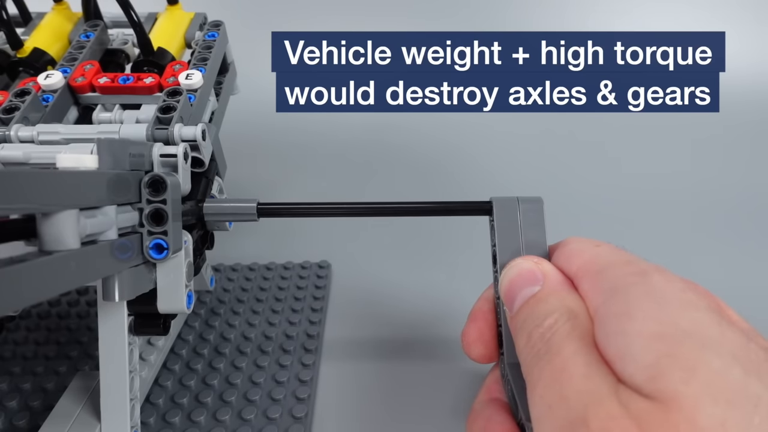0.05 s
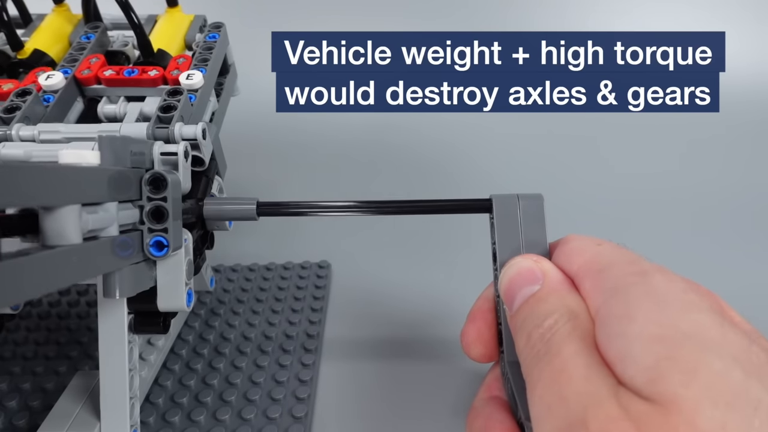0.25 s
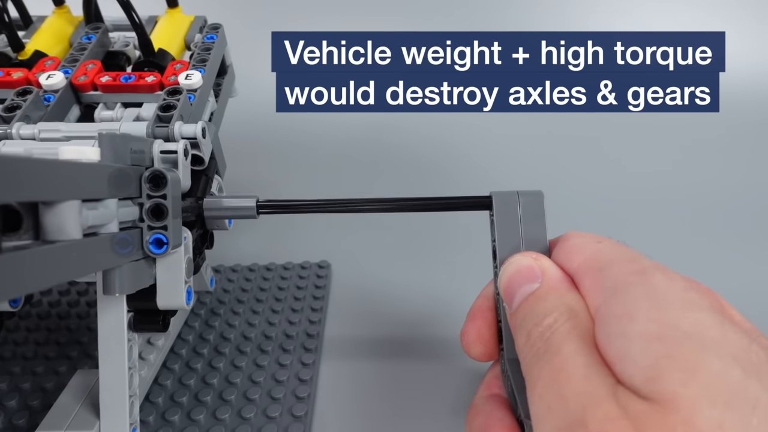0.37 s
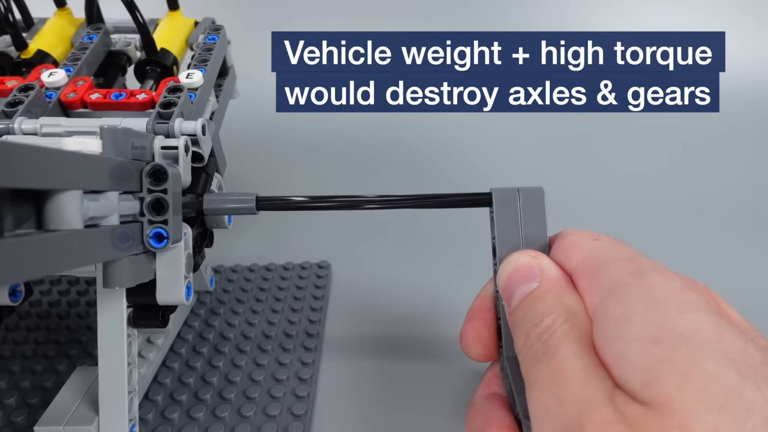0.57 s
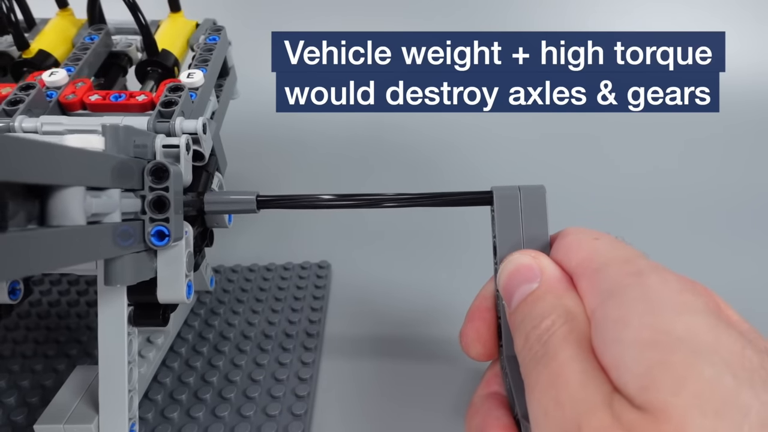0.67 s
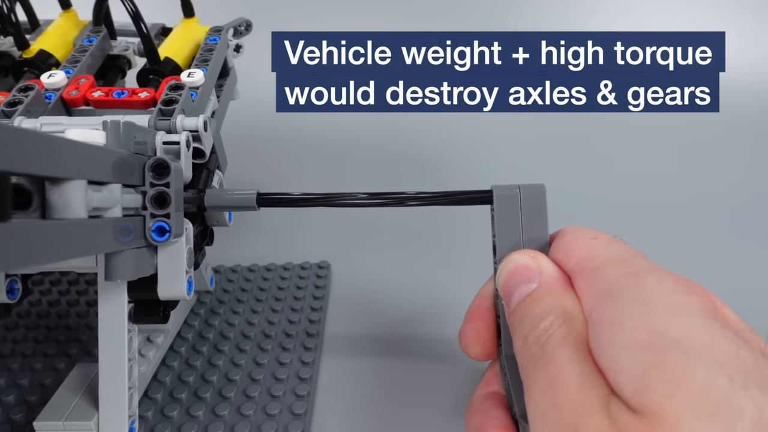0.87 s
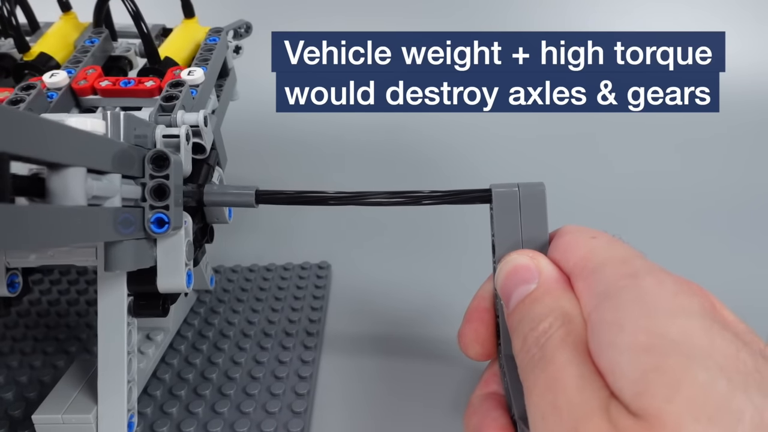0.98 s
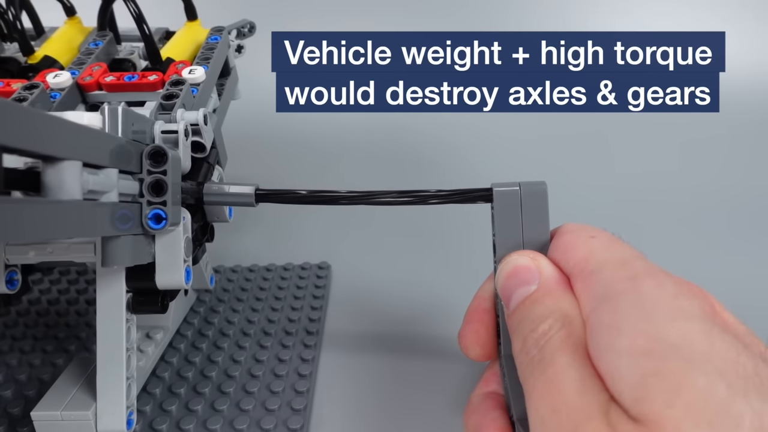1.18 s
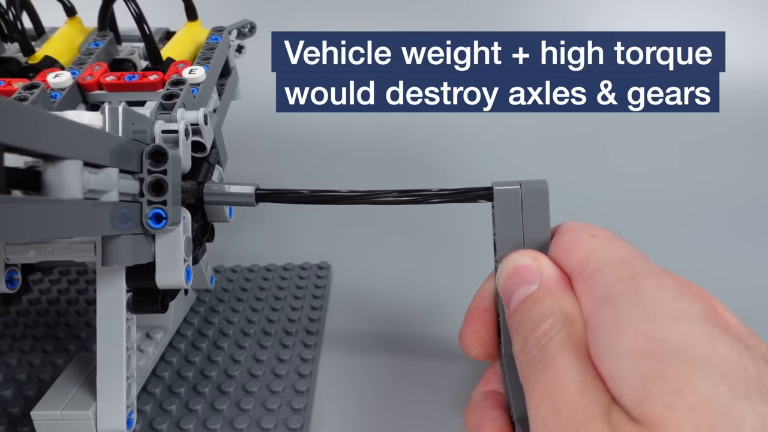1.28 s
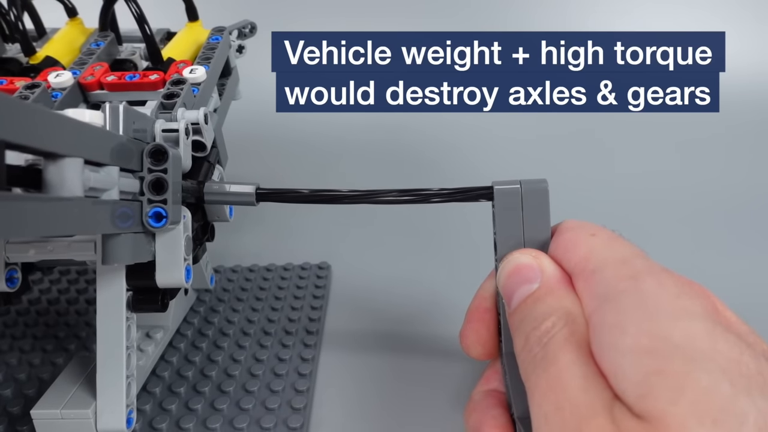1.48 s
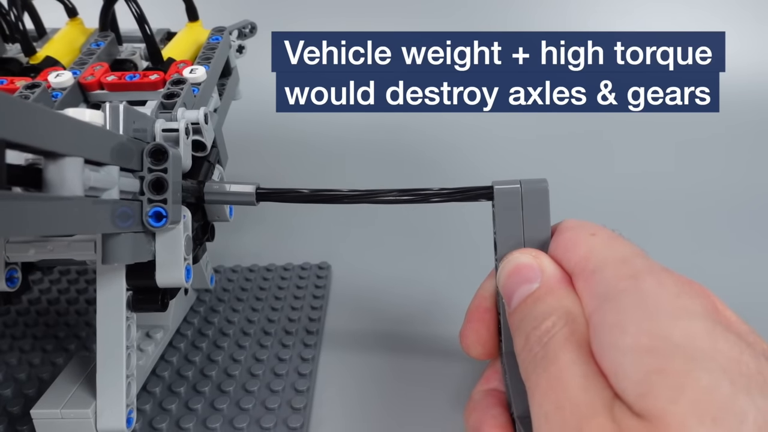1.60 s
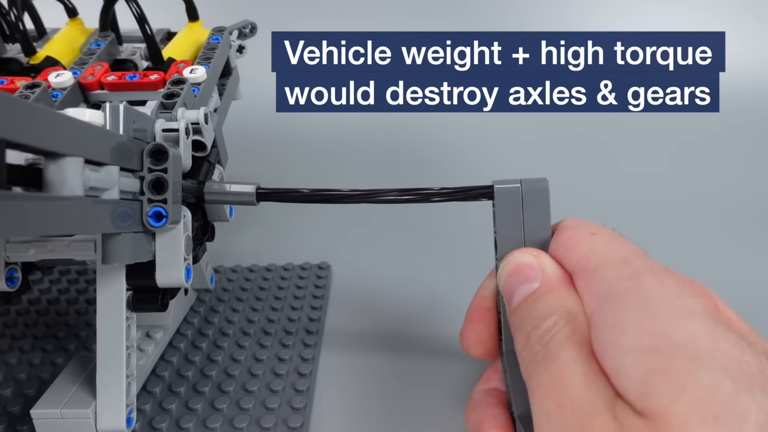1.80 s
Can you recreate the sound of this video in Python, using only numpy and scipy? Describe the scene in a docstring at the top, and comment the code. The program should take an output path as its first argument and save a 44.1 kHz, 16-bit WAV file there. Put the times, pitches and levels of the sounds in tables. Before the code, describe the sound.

Plastic parts creak in short hissing rasps, then snap, with faint air hiss.

```python
"""A plastic toy axle twists under load in an air-driven model, close to a stereo microphone on a table.
First air seeps faintly as pressure builds, and the parts crackle as they take up the load.
Then they give way in short hissing rasps, some with a thin squeak, and the jerks thud through the frame.
Just after one second a joint snaps over and back, exciting the frame's normal modes.
A few soft knocks follow, and air goes on leaking with a thin hiss and an airy whistle."""
import sys
import numpy as np
from scipy import signal
from scipy.fft import rfft, irfft
from scipy.io import wavfile

SR = 44100
rng = np.random.default_rng(int(sys.argv[2]) if len(sys.argv) > 2 else 0)


def wrap_up_sound(samples):
    """Save the sound to the file named by the first command line argument, as 16-bit audio."""
    columns = np.atleast_2d(samples).T
    # keep every value between -1 and 1, then stretch to whole-number steps
    tamed = np.clip(columns, -1, 1)
    steps = np.round(tamed * 32767).astype(np.int16)
    wavfile.write(sys.argv[1], SR, steps)


N = 81585


def undb(db):
    """Amplitude ratio of a level in decibels."""
    return 10 ** (np.asarray(db) / 20)


def pan(db):
    """Left and right gains for a level difference."""
    return undb(np.array([[db], [-db]]) / 2)


def clock():
    """Time of every sample."""
    return np.arange(N) / SR


def noise(own=0.78):
    """White noise at 0 dB per Hz, partially coherent between the two microphone ports."""
    white = rng.standard_normal((3, N))
    return (np.sqrt(1 - own ** 2) * white[0] + own * white[1:]) * np.sqrt(SR / 2)


def wander(rate_hz):
    """Linear interpolation between random values of unit variance."""
    return np.interp(clock() * rate_hz, np.arange(N), rng.standard_normal(N))


def colour(x, points, size=2048):
    """Minimum-phase filter through (f/Hz, level/dB) points, by folding the cepstrum."""
    hz, db = np.array(points, float).T
    f = np.maximum(np.fft.rfftfreq(size, 1 / SR), 1)
    cepstrum = irfft(np.log(undb(np.interp(np.log(f), np.log(hz), db))))
    cepstrum[1:size // 2] *= 2
    cepstrum[size // 2 + 1:] = 0
    response = irfft(np.exp(rfft(cepstrum)))
    return np.apply_along_axis(signal.fftconvolve, -1, x, response)[..., :N]


def resonate(x, hz, width_hz):
    """Two resonators in cascade, with unit gain at the centre."""
    b, a = signal.iirpeak(hz, hz / width_hz, fs=SR)
    return signal.lfilter(b, a, signal.lfilter(b, a, x))


def cut(x, hz, kind="low"):
    """Second-order low-pass or high-pass."""
    return signal.sosfilt(signal.butter(2, hz, kind, fs=SR, output="sos"), x)


def swell(peak, hold, rise, fall):
    """Exponential growth up to the peak time, a plateau, then exponential decay."""
    t = clock() - peak
    return np.exp(np.minimum(t, 0) / rise - np.maximum(t - hold, 0) / fall)


def blow(start, rise, fall):
    """Transient envelope: a linear ramp, then exponential decay."""
    t = np.maximum(clock() - start, 0)
    return np.minimum(t / rise, 1) * np.exp(-np.maximum(t - rise, 0) / fall)


def ring(start, modes, size=22050):
    """Free vibration: a sum of damped modes of random polarity."""
    t = np.arange(size) / SR
    tone = sum(rng.choice([-1, 1]) * undb(db) * np.sin(2 * np.pi * hz * t) * 1000 ** (-t / t60)
               for hz, db, t60 in modes)
    return np.concatenate([np.zeros(int(start * SR)), tone, np.zeros(N)])[:N]


# ambient spectrum (f/Hz, level/dB per Hz)
ROOM_SPECTRUM = [(25, -86.5), (60, -93.5), (130, -88.5), (220, -86.5), (400, -99), (1000, -107),
                 (2500, -116), (16000, -120)]
def room_floor():
    """Stationary noise: the quiet room, strongest at low frequencies."""
    return colour(noise(), ROOM_SPECTRUM)


def reflections(x, port_lag_s=0.00018, early_decay_s=0.0077, t60_s=0.23, size=16384):
    """Sound reaches the left port first; table and model scatter it, and the small room reverberates."""
    t = np.arange(size) / SR
    decays = np.exp([-t / early_decay_s, -np.log(1000) * t / t60_s]) * (t > 0.0006)
    out = []
    for side, lag in zip(x, (0, port_lag_s)):
        early, late = rng.standard_normal((2, size)) * decays
        echoes = undb(-5.5) * early / np.linalg.norm(early) + undb(-12.5) * late / np.linalg.norm(late)
        path = cut(echoes, 193, "high")
        path[round(lag * SR)] += 1  # direct sound
        out.append(signal.fftconvolve(side, path / np.linalg.norm(path))[:N])
    return np.array(out)


# envelope of the first faint leak (t/s, level/dB)
SEEP_ENVELOPE = [(0, -112), (.08, -96.5), (.2, -84.5), (.35, -82), (.5, -82), (.61, -78.5), (.78, -77),
                 (.84, -81), (.905, -76), (1.03, -74), (1.07, -77), (1.2, -107)]
# its spectrum (f/Hz, level/dB)
SEEP_SPECTRUM = [(1000, -13.5), (2600, -13.5), (3500, -12.5), (4400, -11.5), (5500, -10), (6600, -7),
                 (8200, -5.5), (10000, -8), (12200, -2), (16000, -5)]
def seep():
    """Flow noise: air seeps as pressure builds, and fades at the snap."""
    times, levels = np.array(SEEP_ENVELOPE).T
    return colour(noise(), SEEP_SPECTRUM) * undb(np.interp(clock(), times, levels))


# spectrum of the steady leak (f/Hz, level/dB)
LEAK_SPECTRUM = [(1000, -18.5), (2200, -21.5), (2700, -13), (3300, 4), (5600, -2), (7000, 1), (9400, -3.5),
                 (11000, -2), (12300, 2.5), (13600, 5.5), (14400, -11), (16000, -22)]
def leak(start_s=1.15, hiss_rise_s=0.0077, whistle_rise_s=0.11):
    """Flow noise after the snap: a broadband hiss with one late puff, and a growing resonant whistle."""
    t = clock()
    puff_db = 4 * np.exp(-((t - 1.775) / 0.026) ** 2)
    hiss = undb(-80.5 + puff_db) * colour(noise(), LEAK_SPECTRUM)
    hiss *= np.clip((t - start_s) / hiss_rise_s, 0, 1)
    whistle = undb(-66.5) * resonate(noise(), hz=3800, width_hz=550)
    whistle *= np.clip((t - start_s) / whistle_rise_s, 0, 1)
    return (hiss + whistle) * undb(0.71 * wander(39.66))


# jerks of the frame (t/s, level/dB, f/Hz)
JERKS = [(.183, -48, 214), (.224, -24, 235.7), (.243, -24, 180.6), (0.273, -30, 157), (0.305, -32, 164),
         (.388, -29.5, 184), (.420, -28.5, 161.7), (0.545, -27.5, 190), (.594, -39, 148),
         (0.649, -40.5, 180), (0.699, -34, 176), (0.727, -32, 162.6), (0.947, -27.5, 170.3),
         (0.986, -31, 185.6), (1.086, -22.5, 206.8), (1.153, -32, 213), (1.465, -44.5, 197)]
# modes of table and room (f/Hz, level/dB, T60/s)
TABLE_MODES = [(124.9, -11.5, 0.31), (150.5, -10, 0.43), (218.6, -13, 0.56)]
# spectrum of the shaken loose parts (f/Hz, level/dB)
RUSTLE_SPECTRUM = [(80, -13.5), (150, 2.5), (270, 2), (420, -4), (600, -13), (1200, -27), (4000, -53)]
def thuds(rise_s=0.0053):
    """Damped oscillation: each jerk rocks the frame, shakes loose parts and sets the table booming."""
    out, shake = 0, 0
    for start, db, hz in JERKS:
        rock = blow(start, rise_s, fall=0.025) * np.sin(2 * np.pi * hz * (clock() - start))
        out += undb(db) * (rock + ring(start, TABLE_MODES))
        shake += undb(db) * blow(start, rise_s, fall=0.03)
    return out + undb(-41) * colour(noise() * shake, RUSTLE_SPECTRUM)


# small slips of the loaded parts (t/s, decay/s, level/dB)
SLIPS = [(0.209, 0.012, -68.5), (0.222, 0.0071, -75.5), (0.2266, 0.0038, -64), (0.2329, 0.021, -68),
         (0.2697, 0.0015, -62), (0.272, 0.0027, -62.5), (0.2872, 0.0043, -64.5), (0.307, 0.013, -78.5),
         (0.422, 0.015, -70.5), (0.591, 0.0061, -73.5), (0.598, 0.0045, -79), (0.699, 0.0078, -68),
         (0.746, .004, -60.5)]
# their spectrum (f/Hz, level/dB)
SLIP_SPECTRUM = [(150, 3), (600, -6), (1000, -4.5), (1400, -8.5), (2400, 0.5), (4000, 0), (7000, -2),
                 (11000, -2), (16000, -8)]
def crackles():
    """Stick-slip friction: clusters of tiny slips between plastic parts radiate bursts of noise."""
    force = sum(undb(db) * blow(start, 0.0011, decay) for start, decay, db in SLIPS)
    return colour(noise() * force * undb(1.1 * wander(1800)), SLIP_SPECTRUM)


# squeaks that lead into a rasp or ride on it (peak t/s, rise/s, f/Hz, level/dB)
SQUEAK_EVENTS = [(.522, 0.0059, 4300, -61.5), (.545, .006, 12800, -67), (.660, 0.023, 4070, -60.5),
                 (.664, 0.012, 12140, -45), (.918, 0.043, 4400, -61.5), (.930, 0.041, 6530, -63.5),
                 (0.985, .006, 8250, -47), (0.991, 0.006, 3750, -51.5), (.988, 0.011, 12800, -42),
                 (1.128, 0.011, 11200, -51.5)]
def squeaks(width_hz=590, fall_s=0.0088):
    """Forced resonance: a narrow band of noise swells as the parts are about to give way."""
    drive = noise()
    return sum(undb(db) * resonate(drive, hz, width_hz) * swell(peak, 0, rise, fall_s)
               for peak, rise, hz, db in SQUEAK_EVENTS)


# rasps (t/s, hold/s, L-R/dB, rush level/dB, then f/Hz, level/dB for each of three gap resonances)
RASP_EVENTS = [(.380, 0.011, 0.5, -66, 4450, -66, 7100, -62, 12600, -62),
               (0.411, 0.0092, -2.5, -67.5, 4480, -59, 6300, -64.5, 13600, -88),
               (0.532, 0.02, -0.5, -64.5, 3660, -58.5, 6520, -57, 13000, -60.5),
               (0.657, 0.029, -1, -68, 4100, -55.5, 6700, -63.5, 11500, -59),
               (0.712, 0.024, -1, -63, 4040, -59.5, 5900, -53, 12300, -62),
               (.927, 0.014, -2.5, -70, 4350, -56.5, 6500, -63, 12140, -55),
               (0.949, 0.016, 4.5, -67.5, 3870, -63.5, 6440, -67, 13200, -75),
               (0.979, 0.023, -2, -61, 3880, -53, 6000, -58, 12200, -60),
               (1.108, 0.043, -0.5, -71.5, 4040, -52, 7400, -60, 11900, -63.5)]
# spectrum of the broadband rush (f/Hz, level/dB)
RUSH_SPECTRUM = [(200, -11.5), (600, -12), (1000, -14.5), (1400, -18), (2300, -4.5), (2900, -5.5),
                 (3600, -3), (5500, -3), (7600, 1), (8600, 3), (10000, 1), (11000, 4), (14500, 6.5),
                 (16000, -20)]
def rasps(widths_hz=(1120, 1350, 1660)):
    """Noise-driven resonances of the gap: each rasp starts as a ringing hiss and opens into a rush."""
    ringing, rush_envelope, drive = 0, 0, noise()
    for peak, hold, pan_db, rush_db, *gap in RASP_EVENTS:
        rush_envelope += undb(rush_db) * pan(pan_db) * swell(peak, hold, rise=0.0047, fall=0.0073)
        push = drive * pan(pan_db) * swell(peak, hold, rise=0.01, fall=0.015)
        for hz, db, width in zip(gap[::2], gap[1::2], widths_hz):
            ringing += undb(db) * resonate(push + 1e-18, hz, width)
    rush = colour(noise() * rush_envelope, RUSH_SPECTRUM)
    grain = undb(0.5 * wander(700))
    return (ringing + rush) * grain


# snaps of the joint, then knocks (t/s, level/dB, cutoff f/Hz, focus f/Hz, L-R/dB, ring level/dB)
IMPACTS = [(1.0825, -8.5, 15300, 4640, -8, 2), (1.0855, -12, 10800, 2300, 7.5, 3),
           (1.0905, -16.5, 3940, 1050, 4.5, 1.5), (1.1525, -9, 9000, 1530, -3, 0.5),
           (1.155, -18.5, 1470, 833, -1.5, 7.5), (1.345, -17.5, 380, 488, -1, 1.5),
           (1.427, -21.5, 553, 570, 2, 1.5), (1.4645, -29.5, 2600, 1760, -1.5, 10.5),
           (1.467, -18, 660, 585, 1, -2.5)]
# normal modes of the plastic frame (f/Hz, level/dB, T60/s)
FRAME_MODES = [(403, -14.5, 0.051), (621, -11.5, 0.059), (734, -7.5, 0.047), (914, -6, .1),
               (1005, -8, 0.067), (1514, -3, 0.026), (1597, 1.5, 0.032), (1970, -27, 0.023),
               (2070, -18, 0.045), (2356, 1, 0.024), (4760, 1, 0.034), (5830, -5, 0.043),
               (6500, -15, 0.029), (11800, 2.5, .04)]
# spectrum of the contact crack (f/Hz, level/dB)
CRACK_SPECTRUM = [(100, -1.5), (400, 0.5), (650, -3), (950, 2), (1200, -8.5), (1550, 8), (2900, 3.5),
                  (4400, -1), (6500, 4.5), (8300, 0.5), (11300, -2.5), (16000, 2)]
def snaps(focus_db=12, focus_octaves=0.39):
    """Impact excitation: a crack, a rattle and modes favoured near one pitch; soft knocks are duller."""
    out = 0
    crack_noise, rattle_noise = noise() / np.sqrt(SR / 2), rng.standard_normal((2, N))
    for start, db, cutoff_hz, focus_hz, pan_db, ring_db in IMPACTS:
        crack = undb(-1) * colour(crack_noise * blow(start, rise=0.00055, fall=0.0036), CRACK_SPECTRUM)
        rattle = undb(-19) * cut(rattle_noise * blow(start, rise=0.0088, fall=0.05) + 1e-18, hz=1890)
        modes = [(hz, mode_db + focus_db * np.exp(-(np.log2(hz / focus_hz) / focus_octaves) ** 2), t60)
                 for hz, mode_db, t60 in FRAME_MODES]
        ringing = undb(ring_db - 16) * ring(start, modes)
        out += cut(crack + ringing + rattle, cutoff_hz) * undb(db) * pan(pan_db)
    return out


def scene(low_cut_hz=99):
    """Superposition: the small parts, weak in deep bass, sound in the room over its noise floor."""
    parts = snaps() + crackles() + rasps() + squeaks() + thuds() + seep() + leak()
    radiated = cut(cut(parts, low_cut_hz, "high"), low_cut_hz, "high")
    return reflections(radiated) + room_floor()


# level difference between the ports (f/Hz, L-R/dB)
PORT_BALANCE = [(60, -4), (170, -1), (350, 4.5), (700, -1), (1400, 3.5), (2800, 0.5), (5600, -1),
                (10000, 2), (14000, -2.5)]
def record(dry, ceiling=0.6, top_hz=15850):
    """Transduction: the ports differ in response, saturation rounds the peaks, a low-pass cuts the top."""
    ports = np.array([colour(side, [(hz, sign * db / 2) for hz, db in PORT_BALANCE])
                      for side, sign in zip(dry, (1, -1))])
    rounded = ceiling * np.tanh(ports / ceiling)
    return signal.sosfilt(signal.ellip(10, 0.2, 80, top_hz, fs=SR, output="sos"), rounded)


dry = scene()
out = record(dry)
wrap_up_sound(out)
```